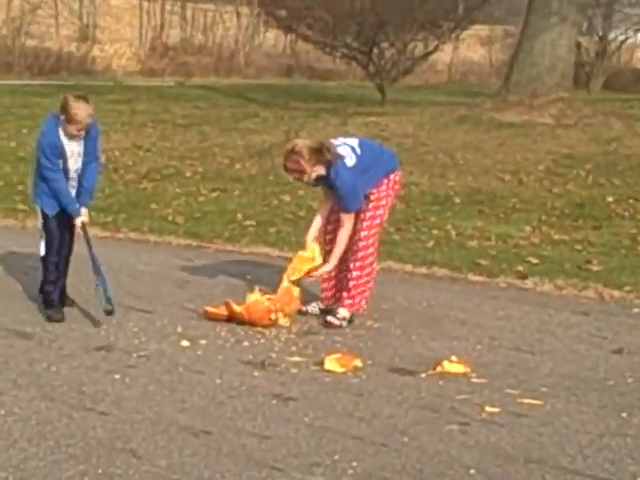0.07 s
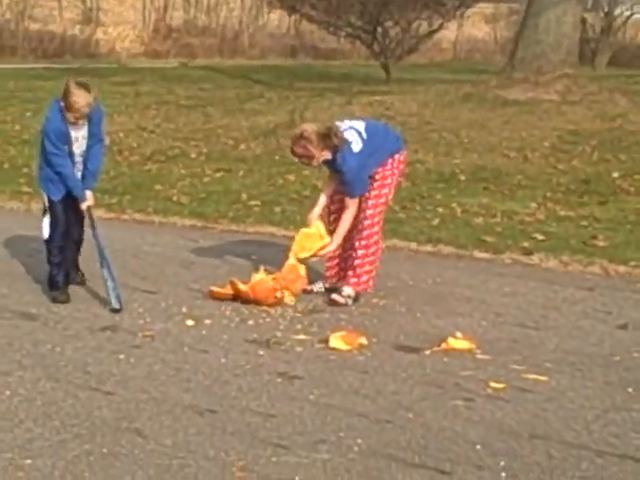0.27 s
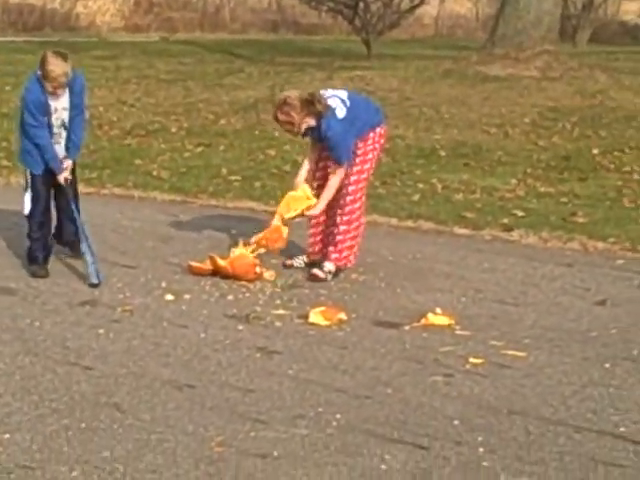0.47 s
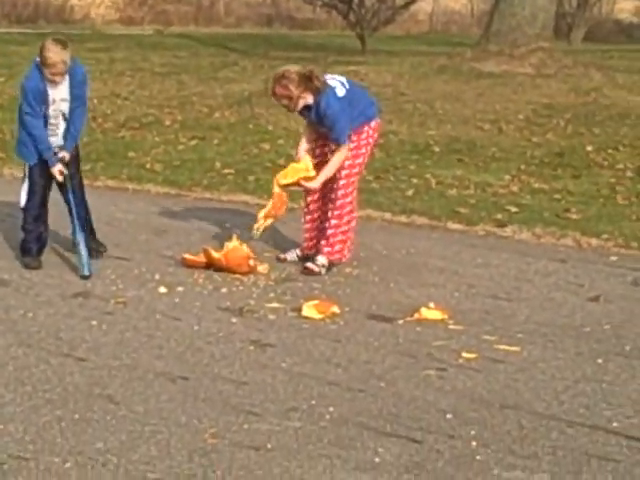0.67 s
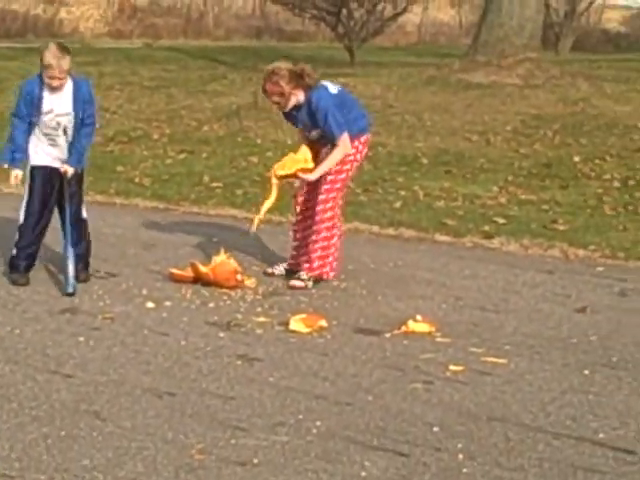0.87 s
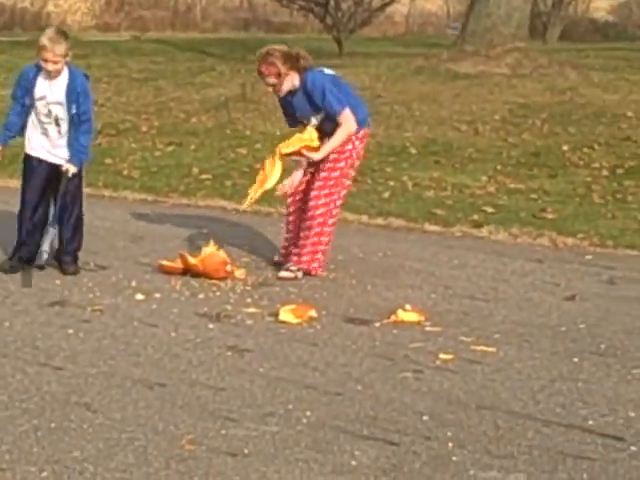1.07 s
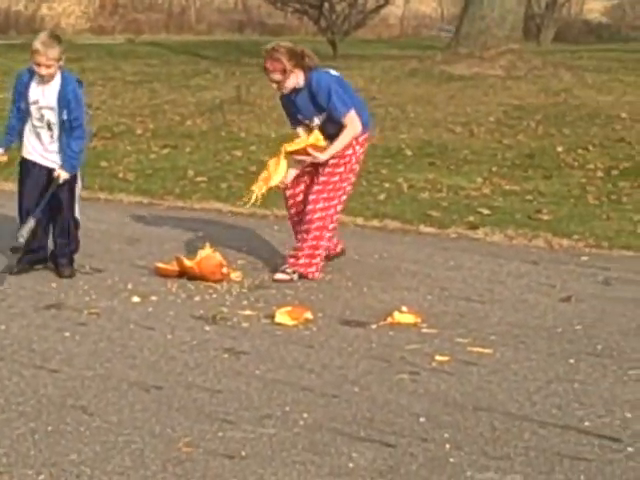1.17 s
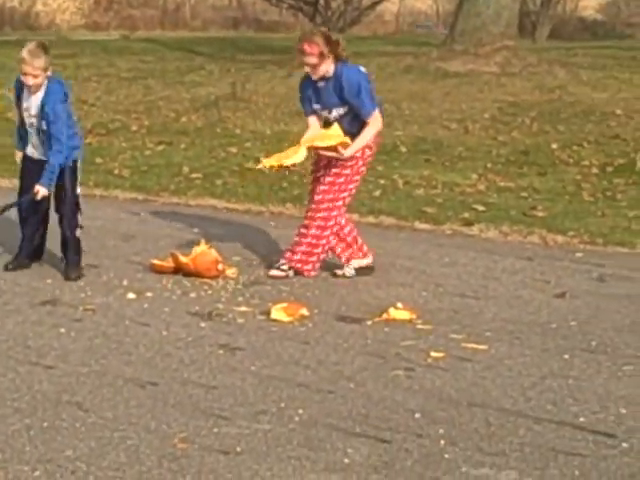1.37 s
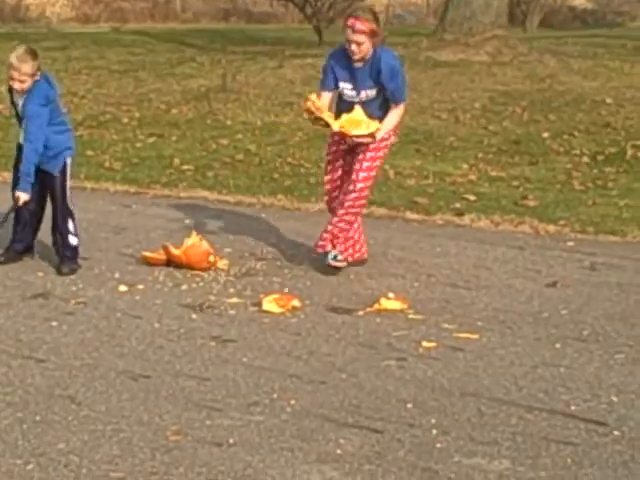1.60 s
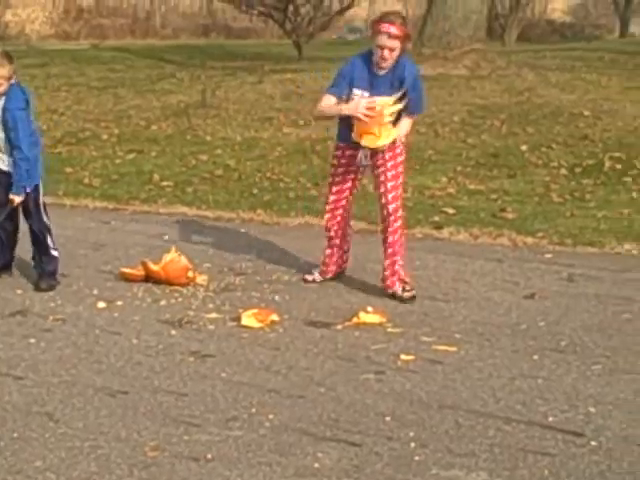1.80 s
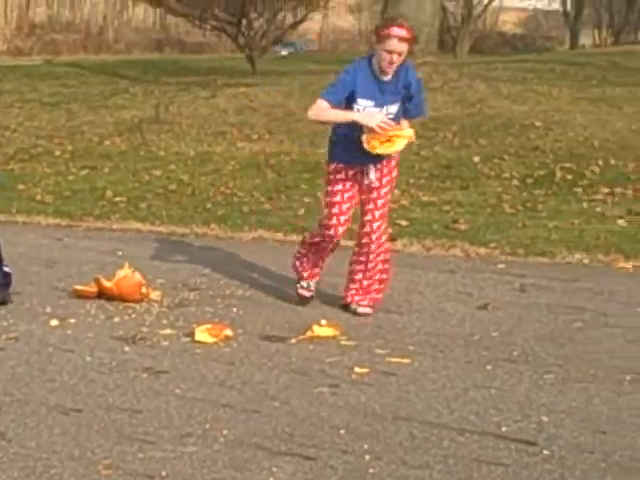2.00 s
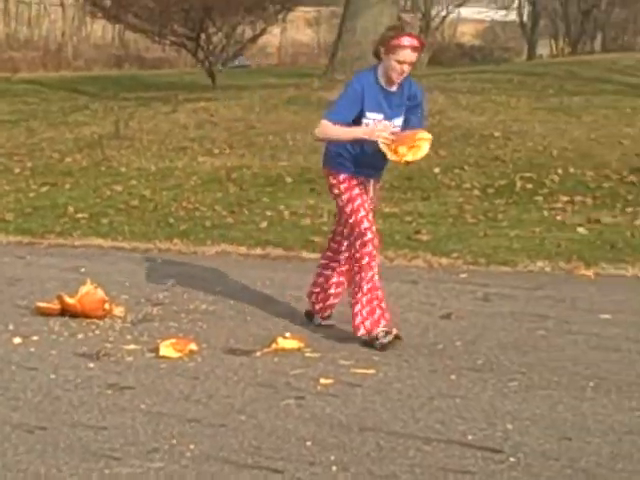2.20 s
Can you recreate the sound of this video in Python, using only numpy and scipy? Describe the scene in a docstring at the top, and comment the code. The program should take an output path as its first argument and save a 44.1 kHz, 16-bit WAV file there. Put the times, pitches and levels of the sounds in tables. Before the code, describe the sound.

Three sharp knocks of a hollow bat on pavement outdoors, over faint steps and breeze.

```python
"""An asphalt driveway, with one microphone several metres from a hollow bat that is tapped three times.
Each tap knocks, cracks on the grit, rings the barrel and comes back off a wall and the yard.
Shoes step softly and scuff over loose grit, and a breeze rumbles right on the microphone.
A small bird trills thinly over the distant hush of traffic and trees."""
import sys
import numpy as np
from scipy import signal
from scipy.fft import rfft, irfft
from scipy.io import wavfile

SR = 44100
rng = np.random.default_rng(int(sys.argv[2]) if len(sys.argv) > 2 else 0)


def master_out(mix):
    """Clip the mix to full scale and print it as 16-bit PCM to the path in sys.argv[1]."""
    frames = np.transpose(np.atleast_2d(mix))
    ceiling = np.clip(frames, -1, 1)
    pcm = np.round(ceiling * 32767).astype(np.int16)
    wavfile.write(sys.argv[1], SR, pcm)


N = 99225


def undb(db):
    return 10 ** (np.asarray(db) / 20)


def noise(colour):
    """Noise of rms 1, its spectrum shaped by (Hz, dB) points."""
    hz, db = np.array(colour).T
    bin_db = np.interp(np.log(np.fft.rfftfreq(N, 1 / SR) + 1e-9), np.log(hz), db)
    x = irfft(rfft(rng.standard_normal(N)) * undb(bin_db), N)
    return x / x.std()


def clock(start=0):
    """Seconds since start, zero before it."""
    return np.maximum(np.arange(N) / SR - start, 0)


def fade(t, t60):
    return np.exp(-np.log(1000) * t / t60)


def curve(points):
    """Gain over time from (s, dB) points."""
    return undb(np.interp(clock(), *np.array(points).T))


def delay(x, seconds):
    return np.pad(x, (int(seconds * SR), 0))[:N]


def swell(start, length):
    """A rounded arch of gain with steep sides."""
    return np.sqrt(np.abs(np.sin(np.pi * np.minimum(clock(start) / length, 1))))


# The far background. Each row: frequency in Hz, relative level in dB.
HUSH_COLOUR = [(20, 3.5), (60, -16), (98, 4), (125, -9), (200, -4.5), (330, -14), (550, -19.5),
               (820, -11.5), (1200, -11), (1550, -6), (2200, -11.5), (3200, -19), (6200, -30.5),
               (11000, -34), (13700, -31.5), (16000, -37)]
# Its slow drift. Each row: time in seconds, level in dB.
HUSH_LEVELS = [(0, -56), (.18, -53.5), (.45, -54), (1.2, -53), (2.25, -51)]
def distant_hush():
    """Far-off traffic and trees blend into a nearly steady noise."""
    return noise(HUSH_COLOUR) * curve(HUSH_LEVELS)


# Rumble right on the microphone. Each row: frequency in Hz, relative level in dB.
WIND_COLOUR = [(15, 9.5), (35, 9.5), (80, 0), (140, -8.5), (250, -17), (500, -33), (2000, -102)]
# The gusts. Each row: time in seconds, level in dB before buffeting.
GUST_LEVELS = [(0, -70), (.27, -57.5), (.37, -46.5), (.58, -50), (.65, -46.5), (.81, -44.5), (.86, -60),
               (.93, -44), (.98, -53), (1.14, -47.5), (1.28, -53.5), (1.5, -63), (2.25, -61)]
def wind():
    """Gusts buffet the microphone with a low, fluttering rumble."""
    buffet = undb(3 * noise([(12, 0), (40, -30), (200, -90)]))
    return noise(WIND_COLOUR) * curve(GUST_LEVELS) * buffet


# The bat, several metres off. Each row: start in seconds, knock, crack and grit gains in dB,
# ring length factor, echo gain in dB.
BAT_TAPS = [(0.2007, 2.5, -10.5, -20, 0.89, -7.5), (1.66, -2.5, -31, -29, 0.79, -12),
            (1.9124, -3, -16, -23.5, 0.97, -8)]
# The tip's dead knock on asphalt. Each row: frequency in Hz, t60 in seconds, relative level in dB.
KNOCK_MODES = [(292, 0.018, -19.5), (385.5, 0.017, -17), (766, 0.014, -9.5), (862, 0.019, -19.5),
               (917, 0.026, -22.5), (1283, 0.036, -25)]
# The hollow barrel's modes, each a frequency in Hz.
BARREL_MODES_HZ = [645, 1390, 2091, 2228, 2565, 2744, 3580, 4000, 4300, 4470, 5502, 5872, 8740]
# Their ring; the place of contact sets the strengths.
# Each row: base t60 in seconds, then level in dB for the first, second and third tap.
BARREL_RING = [(0.12, -22, -20.5, -21), (0.052, -49, -22, -23.5), (0.79, -37, -86, -47),
               (0.094, -27.5, -27, -34.5), (0.027, -16.5, -28, -55), (0.11, -25, -33, -39.5),
               (0.026, -21.5, -33, -27.5), (0.027, -50, -30, -30), (0.012, -11, -30, -36),
               (0.03, -33, -40, -30.5), (0.11, -44, -63, -46), (0.069, -54, -47, -57),
               (0.022, -49, -49, -47)]
# Contact noise, a crack and brighter grit. Each row: frequency in Hz, relative level in dB.
CRACK_COLOUR = [(60, -48), (200, 15.5), (450, -17), (900, -14), (1400, 12), (1900, -13), (3000, -21.5),
                (4300, -0.5), (5000, -25), (16000, -41)]
GRIT_COLOUR = [(500, -24), (1500, 12), (4000, 2.5), (5000, 2), (6300, 5.5), (8500, 1.5), (11000, -3),
               (14000, 0), (17000, 6)]
# The wall's echo comes later as the bat moves away. Each entry: one tap's lag in seconds.
WALL_LAGS_S = [.0256, .0279, .0291]
def bat():
    """Each tap knocks, rings the barrel and cracks on the grit; the yard and a wall answer."""
    crack_t60_s, grit_t60_s = 0.011, 0.025
    contact_rise_s, mode_rise_s = 0.0011, 0.0014
    radiates_above_hz = 170
    low_cut = signal.butter(3, radiates_above_hz, "high", fs=SR, output="sos")
    out = 0
    for k, (start, knock_db, crack_db, grit_db, ring_factor, echo_db) in enumerate(BAT_TAPS):
        t = clock(start)
        knock = sum(undb(db + knock_db) * np.cos(2 * np.pi * hz * t) * fade(t, t60)
                    for hz, t60, db in KNOCK_MODES)
        barrel = sum(undb(tap_dbs[k]) * np.cos(2 * np.pi * hz * t) * fade(t, t60 * ring_factor)
                     for hz, (t60, *tap_dbs) in zip(BARREL_MODES_HZ, BARREL_RING))
        crack = undb(crack_db) * noise(CRACK_COLOUR) * fade(t, crack_t60_s)
        grit = undb(grit_db) * noise(GRIT_COLOUR) * fade(t, grit_t60_s)
        contact = (crack + grit) * np.minimum(t / contact_rise_s, 1)
        modes = (knock + barrel) * np.minimum(t / mode_rise_s, 1)
        tap = signal.sosfilt(low_cut, contact + modes)
        echo = undb(echo_db) * wall_echo(tap, WALL_LAGS_S[k])
        tail = undb(-15.5) * delay(yard_scatter(tap, t60=0.42), seconds=0.008)
        out += tap + echo + tail
    return out


# The yard around the microphone. Each row: frequency in Hz, relative level in dB.
YARD_COLOUR = [(100, 21), (300, -13), (700, 1.5), (1500, -18), (2500, -8), (4500, -2), (8000, 3),
               (16000, -10.5)]
def yard_scatter(sound, t60):
    """Many small reflections die away together."""
    response = noise(YARD_COLOUR) * fade(clock(), t60)
    return signal.fftconvolve(sound, response / np.linalg.norm(response))[:N]


def wall_echo(tap, lag_s, cutoff_hz=1700):
    """A wall returns the tap late, dulled and slightly smeared."""
    dull = signal.sosfilt(signal.butter(1, cutoff_hz, fs=SR, output="sos"), tap)
    return delay(dull + 0.23 * yard_scatter(dull, t60=0.14), lag_s)


# Steps on the driveway. Each row: start in seconds, pitch in Hz, t60 in seconds, level in dB.
FOOTFALLS = [(0.503, 257, 0.049, -43.5), (0.671, 171, 0.02, -29.5), (0.807, 111, 0.092, -40),
             (1.344, 279, 0.034, -37.5)]
def footsteps(rise_s=0.0038):
    """Soles land softly: a low thud with a little contact noise."""
    out = 0
    for start, hz, t60, db in FOOTFALLS:
        t = clock(start)
        thud = np.sin(2 * np.pi * hz * t) + 0.14 * noise(CRACK_COLOUR)
        out += undb(db) * fade(t, t60) * np.minimum(t / rise_s, 1) * thud
    return out


# Scuffs on the asphalt. Each row: start in seconds, length in seconds, level in dB.
SHOE_SCUFFS = [(0.644, 0.015, -61), (1.226, 0.019, -59), (1.461, 0.039, -45.5), (2.232, 0.012, -56)]
# Their rasp. Each row: frequency in Hz, relative level in dB.
SCUFF_COLOUR = [(60, -25), (150, 0), (400, -8.5), (800, 2), (1500, -6), (2600, -8), (4300, -7), (7000, -10),
                (11000, -14), (15000, -10.5)]
def scuffs(grain_samples=64):
    """Soles drag over loose grit, the level jumping from grain to grain."""
    out = 0
    for start, length, db in SHOE_SCUFFS:
        grain_db = 2 * rng.standard_normal(N // grain_samples + 1)
        grains = undb(np.repeat(grain_db, grain_samples)[:N])
        out += undb(db) * swell(start, length) * noise(SCUFF_COLOUR) * grains
    return out


# A bird, faint at the microphone. Each row: start in seconds, length in seconds, level in dB.
BIRD_TRILLS = [(0.668, 0.077, -69.5), (1.048, 0.097, -72), (1.495, .07, -73), (1.963, 0.057, -72)]
def bird(pitch_hz=8270, warbles_per_s=88, depth_hz=130):
    """A thin, very high whistle warbles in pitch and strength."""
    out = 0
    for start, length, db in BIRD_TRILLS:
        warble = 2 * np.pi * warbles_per_s * clock(start)
        jitter_hz = 60 * noise([(300, 0), (2000, -38)])
        hz = pitch_hz + depth_hz * np.sin(warble) + jitter_hz
        whistle = np.sin(2 * np.pi * np.cumsum(hz) / SR)
        out += undb(db) * swell(start, length) * (1 - 0.82 * np.cos(warble)) * whistle
    return out


def scene():
    """The driveway from one spot, in mono."""
    return (bat() + scuffs() + footsteps() + bird() + wind() + distant_hush())[None]


def record(dry):
    """The recorder cuts the highest treble steeply."""
    top_hz = 15900
    return signal.sosfilt(signal.ellip(10, 0.2, 70, top_hz, fs=SR, output="sos"), dry)


dry = scene()
out = record(dry)
master_out(out)
```